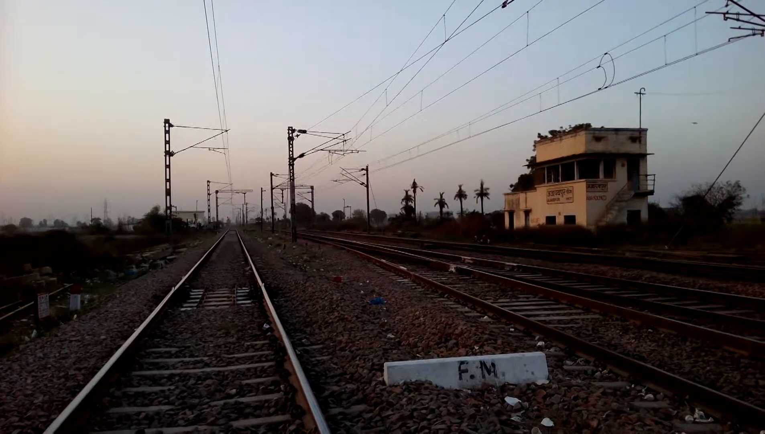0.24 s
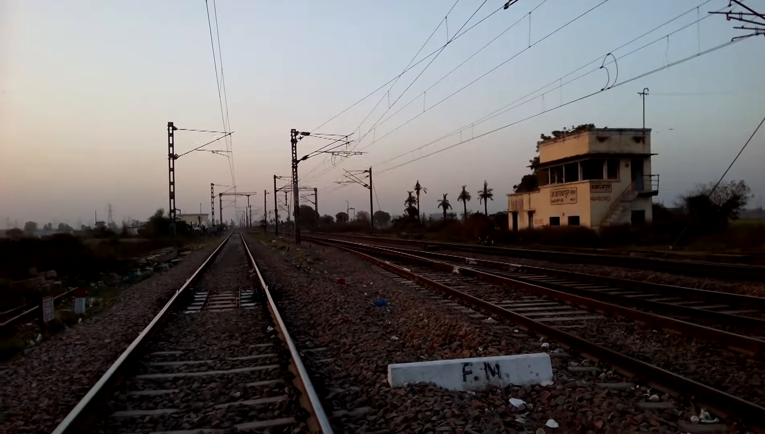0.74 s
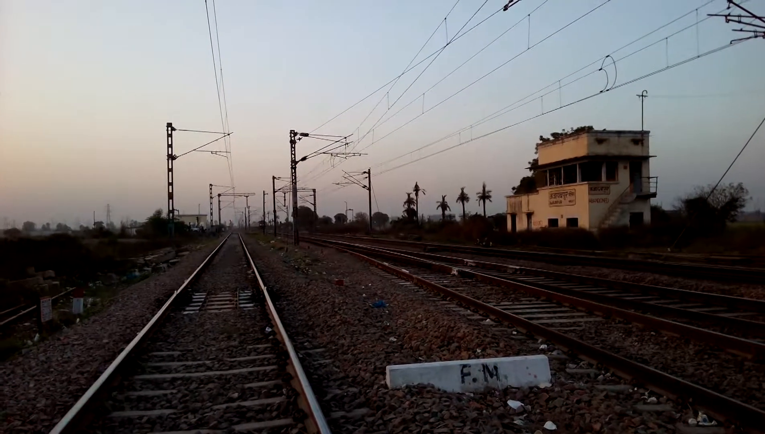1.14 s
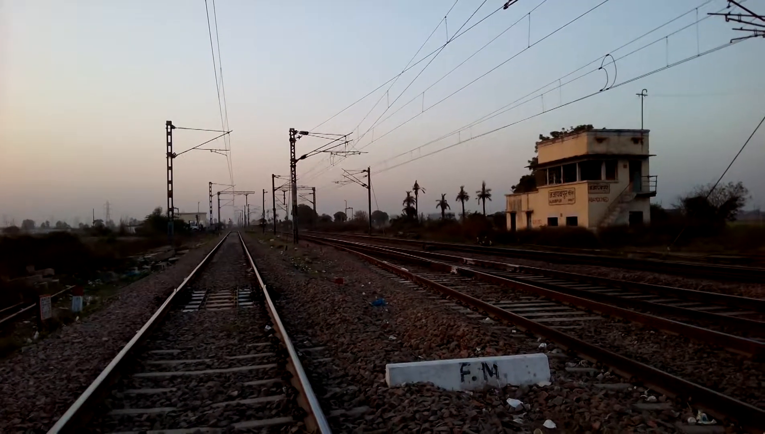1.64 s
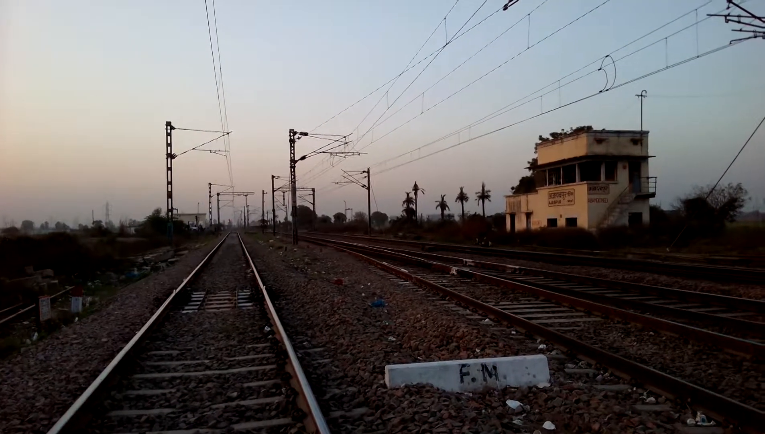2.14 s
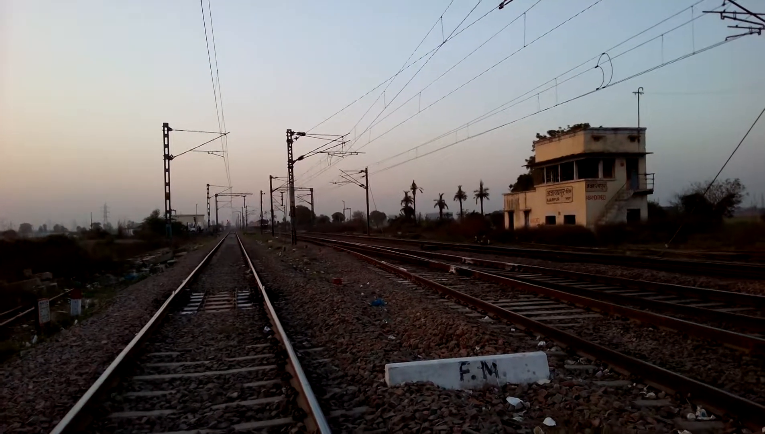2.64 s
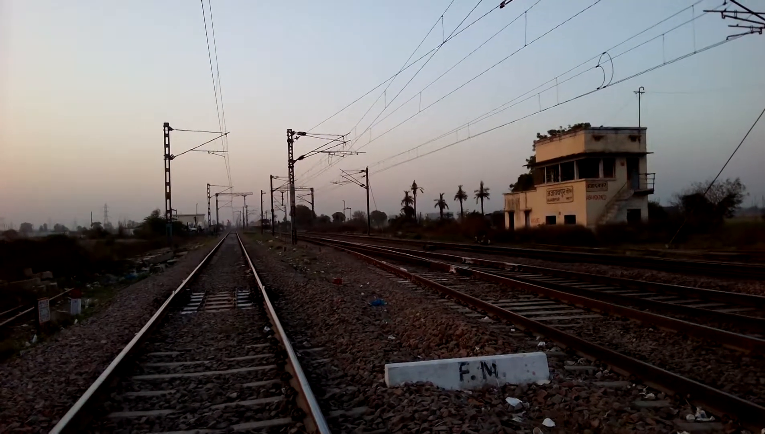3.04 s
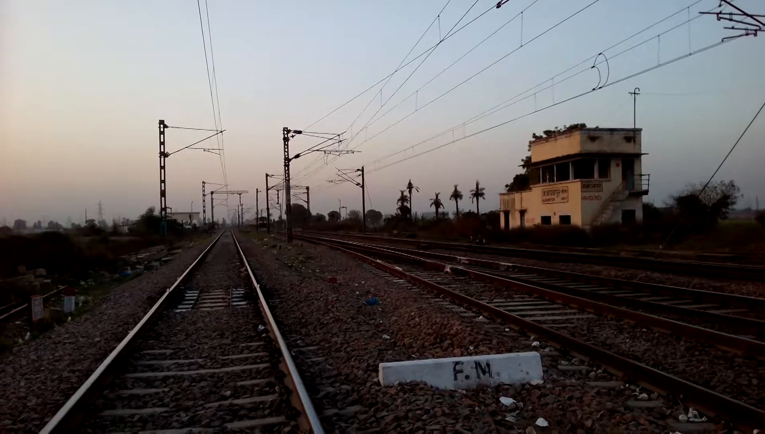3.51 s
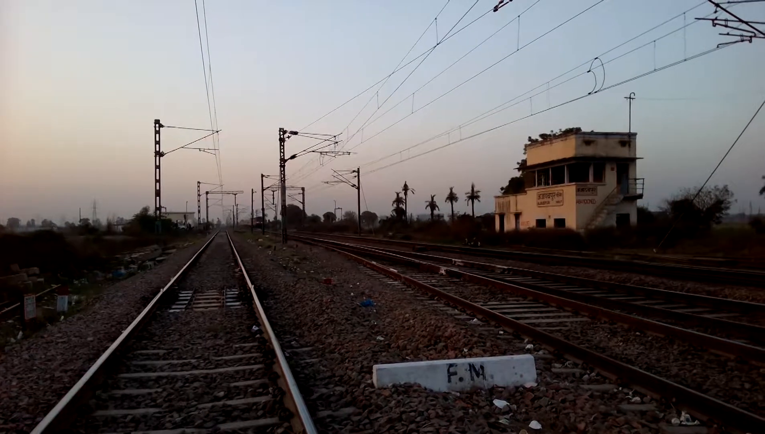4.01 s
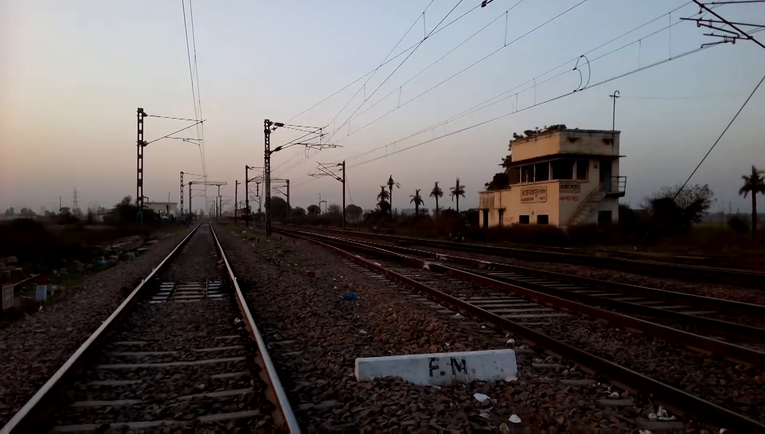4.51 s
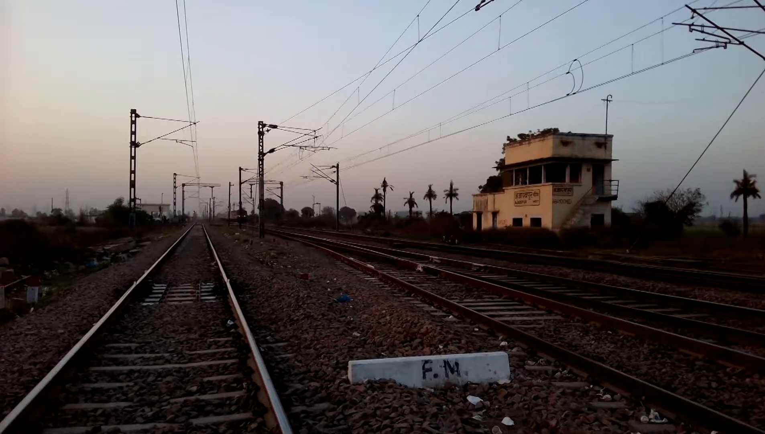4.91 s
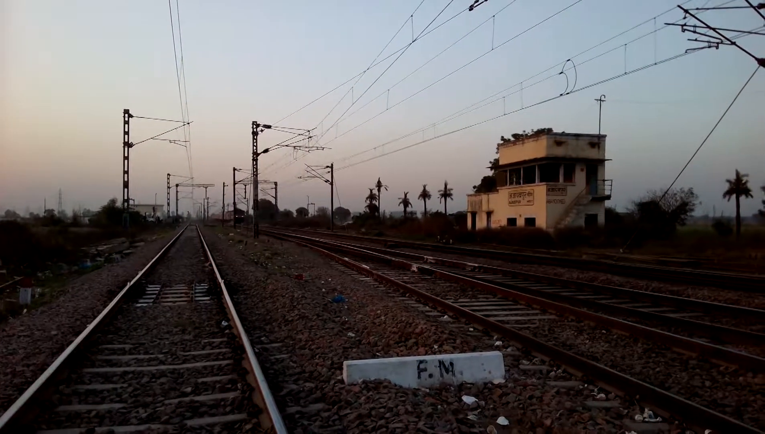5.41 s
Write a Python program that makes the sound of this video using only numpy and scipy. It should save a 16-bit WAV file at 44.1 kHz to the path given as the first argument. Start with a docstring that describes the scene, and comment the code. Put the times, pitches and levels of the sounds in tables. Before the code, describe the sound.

Beside open railway tracks, an approaching locomotive blows one nearly level note with faint sliding echoes. A bird gives quick high trills and raspy chirps, with a sharp tick early on. Rolling rumble and metallic rail song grow; first wheel knocks come around four seconds. The horn shuts off just before five, leaving a brief tail, then crashing, pinging wheels grow loudest at the cut. A small stereo microphone stands close to the line.

```python
"""A train horn holds one slowly rising note for almost five seconds, as a train bears down on a listener.
It is a harmonic series with fluttering partials; Doppler echoes slide to a lower pitch, two in turn.
Shaped noise makes the rumble, roar and ever louder song of the rails; resonances make whine and rail pings.
A small bird trills and chirps in gliding tones, and dry ticks snap and dull knocks thump as noise bursts.
Wheels crash over rail joints from four seconds on, most densely after the horn has stopped."""
import sys
import numpy as np
from scipy import signal
from scipy.fft import rfft, irfft, next_fast_len
from scipy.io import wavfile
from scipy.ndimage import uniform_filter1d

SR = 44100
rng = np.random.default_rng(int(sys.argv[2]) if len(sys.argv) > 2 else 0)


def dump(signal):
    """Clip the signal to [-1, 1] and save it as 16-bit WAV at the path in sys.argv[1]."""
    limited = np.clip(np.atleast_2d(signal).T, -1, 1)
    pcm = np.round(limited * 32767).astype(np.int16)
    wavfile.write(sys.argv[1], SR, pcm)


N = 249689
TIME = np.arange(N) / SR

# the horn's note as heard from ahead, and its creep upwards
HORN_HZ, HORN_RISE_HZ_PER_S = 313.9, 0.25
# the air valve shuts
HORN_STOP_S, RELEASE_DB_PER_S = 4.852, 271.5
# from here the listener slips out of the horn's beam as the train draws level
OFF_AXIS_S = 3.4


def from_db(db):
    """Logarithmic level: decibels to amplitude gain."""
    return 10 ** (np.asarray(db) / 20)


def rms_one(x):
    """Normalisation: scale to unit mean power."""
    return x / np.sqrt(np.mean(x ** 2) + 1e-20)


def in_time(rows):
    """Linear interpolation: each column of a time curve at every sample."""
    s, *columns = np.transpose(rows)
    return [np.interp(TIME, s, column) for column in columns]


def at_hz(points, hz):
    """Logarithmic frequency scale: read a spectrum between its points."""
    point_hz, value = np.transpose(points)
    return np.interp(np.log(np.maximum(hz, 1)), np.log(point_hz), value)


def drift(rate_hz):
    """Random modulation: low-passed noise of spread 1, made at every 40th sample and interpolated."""
    r = np.exp(-80 * np.pi * rate_hz / SR)
    white = rng.standard_normal(N // 40 + 2002)
    slow = signal.lfilter([1], [1, -2 * r, r * r], white)[2000:]    # drop the filter's start-up
    return np.interp(np.arange(N) / 40, np.arange(len(slow)), rms_one(slow))


def two_ports(scatter):
    """Partial coherence: white noise common to both ports, plus a scattered share of opposite sign."""
    common, apart = rng.standard_normal((2, N))
    return common + scatter * apart * np.array([[1], [-1]])


def noise(spectrum, scatter):
    """Spectral shaping: coloured stereo noise of rms 1, falling steeply above the last point."""
    size = next_fast_len(N)
    hz = np.fft.rfftfreq(size, 1 / SR)
    gain = from_db(at_hz(spectrum, hz)) / (1 + (hz / spectrum[-1][0]) ** 40)
    return rms_one(irfft(rfft(two_ports(scatter), size) * gain, size)[:, :N])


def resonate(x, hz, width_hz):
    """Resonance: two poles ring at one frequency, more briefly the wider the band."""
    r = np.exp(-np.pi * width_hz / SR)
    return signal.lfilter([1 - r, 0, r - 1], [1, -2 * r * np.cos(2 * np.pi * hz / SR), r * r], x)


def resonate_twice(x, hz, width_hz):
    """Cascaded resonance: two equal resonators in series give a steep narrow band of rms 1."""
    return rms_one(resonate(resonate(x, hz, width_hz), hz, width_hz))


def burst(s, rise_s, fall_s):
    """Exponential growth and decay: an envelope that swells to 1 at time s and dies away."""
    age = np.where(TIME < s, (s - TIME) / rise_s, (TIME - s) / fall_s)
    return np.exp(-np.minimum(age, 30))


def after_stop(db_per_s, delay_s=0):
    """Exponential decay: a linear fall in dB, once the horn's valve has shut and a delay is over."""
    return -db_per_s * np.maximum(TIME - HORN_STOP_S - delay_s, 0)


def wavering_phase(hz, waver_hz, rate_hz):
    """Frequency modulation: phase [rad] is the running sum of a randomly wavering frequency."""
    return 2 * np.pi * np.cumsum(hz + waver_hz * drift(rate_hz)) / SR


# horn partials: (multiple, level when far [dB], level when near [dB]), against the level of the group
HORN_PARTIALS = [(1, 0, -0.5), (2, 0.5, -0.5), (3, -3.5, -3.5), (4, 2, 2.5), (5, -15.5, -13.5),
                 (6, -12.5, -22), (7, -15.5, -10.5), (8, -18, -16.5), (9, -18, -6), (10, -4.5, -1),
                 (11, -1.5, 1), (12, -11.5, -2.5), (13, -16.5, -4), (14, -18, -15.5)]
# level of the horn's fundamental: (time [s], level [dB])
FUNDAMENTAL_LEVEL = [(0.0, -29), (0.15, -28), (1.2, -26), (1.81, -29), (1.89, -27), (3.88, -27.5),
                     (4.84, -27)]
# level of its octave: (time [s], level [dB])
OCTAVE_LEVEL = [(0.0, -36), (0.81, -32.5), (1.89, -36), (1.93, -40.5), (2.25, -36.5), (2.52, -39.5),
                (2.64, -33), (2.92, -36.5), (3.41, -34), (3.81, -37), (4.52, -35), (4.84, -38.5)]
# level of its blare, partials 3-8: (time [s], level [dB])
BLARE_LEVEL = [(0.0, -37.5), (0.08, -41), (0.92, -38), (1.34, -40.5), (3.03, -37.5), (4.64, -45),
               (4.8, -43)]
# level of its brassy edge, partials 9 and up: (time [s], level [dB])
EDGE_LEVEL = [(0.0, -53.5), (0.409, -50), (1.87, -57), (2.7, -63.5), (2.83, -59), (2.939, -56.5),
              (3.34, -57), (3.55, -51.5), (4.0, -47.5)]
# moving air swells or fades single partials: (time [s], multiple, change [dB], half-length [s])
AIR_SWELLS = [(.08, 11, -11, .22), (.15, 13, 7, .25), (.2, 7, 7, .22), (.2, 14, 5, .2), (.45, 5, 3, .25),
              (.42, 11, 3, .15), (.45, 10, 3, .12), (.7, 11, 2, .18), (2.2, 3, 2.5, .2), (4.55, 7, -3, .35),
              (4.6, 11, -3, .3), (1.25, 11, 3, .4), (3.25, 11, 3, .25), (3.75, 11, -5, .15),
              (3.15, 3, -2, .5), (3.6, 14, -5, .4), (4.2, 6, 4, .45), (.7, 12, 4, .25), (1.2, 5, -7, .25),
              (1.35, 7, -6, .22), (1.4, 10, -12, .3), (1.8, 12, 6, .25), (1.95, 6, -10, .22),
              (2.5, 10, 4, .4), (3.35, 9, 7, .3), (3.7, 10, -9, .28), (3.7, 13, 2, .2), (4.2, 13, -4, .3),
              (4.1, 12, -3, .35), (3.85, 7, 3, .22), (4.4, 5, 4.5, .55)]


def horn(fade_db=1.88, flutter_db=0.9, wobble_hz=0.13, tremor_db=0.35, dispersion_rad=-0.1464,
         blur_rad_per_s=0.1, off_axis_db_per_s=7.5, late_s=0.092, late_share=0.34, late_db_per_s=240):
    """Harmonic series of a driven diaphragm: moving air makes the high partials fade and flutter most."""
    phase = wavering_phase(HORN_HZ + HORN_RISE_HZ_PER_S * TIME, wobble_hz, 14)
    shut_db = after_stop(RELEASE_DB_PER_S)
    off_axis_s = np.maximum(TIME - OFF_AXIS_S, 0)

    # a reflection of the fundamental outlasts the direct sound
    direct = (1 - late_share) * from_db(shut_db)
    late = late_share * from_db(after_stop(late_db_per_s, late_s))
    fundamental_db = in_time(FUNDAMENTAL_LEVEL)[0] + 20 * np.log10(direct + late)
    octave_db = in_time(OCTAVE_LEVEL)[0] + shut_db
    blare_db = in_time(BLARE_LEVEL)[0] + shut_db
    edge_db = in_time(EDGE_LEVEL)[0] + shut_db - off_axis_db_per_s * off_axis_s
    groups = [fundamental_db, octave_db] + [blare_db] * 6 + [edge_db] * 6

    # the ground reflection recolours the note as the train nears
    near = np.interp(TIME, [1.2, 2.4], [0, 1])
    out = np.zeros(N)
    for (k, far_db, near_db), group_db in zip(HORN_PARTIALS, groups):
        air_db = k / 10 * (fade_db * drift(1.82) + flutter_db * drift(28))
        for s, multiple, swell_db, length_s in AIR_SWELLS:
            if multiple == k:
                air_db = air_db + swell_db * np.exp(-((TIME - s) / length_s) ** 2)
        # off the beam, the high partials arrive scattered
        blur = blur_rad_per_s * (k - 1) * off_axis_s * drift(30)
        # the flare spreads each pulse out in time
        partial = np.cos(k * phase + dispersion_rad * k ** 2 + blur)
        level_db = group_db + far_db + (near_db - far_db) * near + air_db
        out += from_db(level_db) * partial
    return np.sqrt(2) * out * from_db(tremor_db * drift(38))


def horn_tail(level_db=-65.5, width_hz=7, fall_db_per_s=12):
    """Diffuse scattering off buildings and trees: narrow noise blurs the low partials and lingers."""
    drive = two_ports(scatter=0.32)
    blur = sum(resonate_twice(drive, k * HORN_HZ, width_hz) for k in range(1, 5))
    return blur * from_db(level_db + after_stop(fall_db_per_s))


def far_echo(level_db=-55, tilt_db=-1.53, flicker_db=3.0, waver_hz=3.504, hold_s=0.3, fall_db_per_s=70):
    """Distant reflection: wavering low partials are still heard for a moment once the horn has shut."""
    phase = wavering_phase(HORN_HZ, waver_hz, 14.92)
    tone = 0
    for k in range(1, 5):
        tone = tone + from_db(tilt_db * (k - 1.5) + flicker_db * drift(6.1)) * np.sin(k * phase)
    return np.sqrt(2) * tone * from_db(level_db + after_stop(fall_db_per_s, hold_s))


# level of the locomotive's whine: (time [s], level [dB])
MOTOR_LEVEL = [(0, -53), (.6, -57), (2.2, -57), (2.7, -55), (3.25, -52.5), (3.6, -61), (4.6, -60),
               (5.1, -76)]


def motor(hz=727, waver_hz=2, flicker_db=2):
    """Pure tone with random modulation: a faint wavering locomotive whine above the horn's octave."""
    phase = wavering_phase(hz, waver_hz, 7.7)
    return np.sqrt(2) * from_db(in_time(MOTOR_LEVEL)[0] + flicker_db * drift(3.7)) * np.sin(phase)


def hum(hz=166, level_db=-56, low_hz=81, low_db=-60.5, waver_hz=1.3, flicker_db=1.3, fade_db_per_s=3):
    """Tonal machinery drone: two wavering notes of the locomotive fade as it draws level."""
    out = 0
    for pitch_hz, db in ((hz, level_db), (low_hz, low_db)):
        phase = wavering_phase(pitch_hz, waver_hz, 11)
        out = out + np.sqrt(2) * from_db(db + flicker_db * drift(2.5)) * np.sin(phase)
    return out * from_db(-fade_db_per_s * np.maximum(TIME - OFF_AXIS_S, 0))


# what the wheels feed into the rail modes: (frequency [Hz], density [dB per Hz])
WHEEL_FORCE_SPECTRUM = [(1500, -5), (2500, 0), (4000, 0), (5500, -10), (7000, -21.5)]
# ringing modes of the rails: (frequency [Hz], width [Hz], level against the rail song [dB])
RINGING_MODES = [(2420, 72, -17), (2624, 37, -13), (3213, 37, -17), (3900, 44, -19.5)]


def rail_ring(flicker_db=4.0):
    """Modal excitation: rough steel rolling on steel rings the rail modes, each swelling on its own."""
    drive = noise(WHEEL_FORCE_SPECTRUM, scatter=0.26)
    out = 0
    for hz, width_hz, db in RINGING_MODES:
        out = out + from_db(db + flicker_db * drift(6.1)) * rms_one(resonate(drive, hz, width_hz))
    return out


# bright part of the rail song, which only carries at short range: (frequency [Hz], density [dB per Hz])
SIZZLE_SPECTRUM = [(900, -26.5), (1550, 1), (2300, -12.5), (3500, 3), (4300, 6.5), (5000, 0.5), (5900, -5),
                   (6700, -31.5), (7400, -42.5)]


def sizzle(patchy_db=2, count=4):
    """Band-wise modulation: the bright hiss of the rails, in bands that swell and fade on their own."""
    size = next_fast_len(N)
    edges_hz = np.geomspace(2800, 7400, count + 1)
    spectrum = rfft(noise(SIZZLE_SPECTRUM, scatter=0.23), size)
    # the outer bands take in all that lies beyond them
    band = np.searchsorted(edges_hz[1:-1], np.fft.rfftfreq(size, 1 / SR))
    out = 0
    for k in range(count):
        out = out + irfft(spectrum * (band == k), size)[:, :N] * from_db(patchy_db * drift(4.2))
    return out


# nearness of the train, as the level of the singing rails: (time [s], level [dB])
APPROACH_LEVEL = [(0.0, -49.5), (0.99, -49.5), (1.51, -49), (1.91, -49), (4.08, -46), (4.68, -46),
                  (5.26, -44.5), (5.45, -42), (5.53, -43.5), (5.6, -39), (5.66, -35.5)]
# low rolling rumble, also shaken by the joints: (frequency [Hz], density [dB per Hz])
RUMBLE_SPECTRUM = [(20, -27.5), (35, -12), (46, -13.5), (62, -10), (82, -8), (102, -18.5), (135, -21),
                   (200, -23)]
# wheel roar: (frequency [Hz], density [dB per Hz])
ROAR_SPECTRUM = [(120, -24.5), (200, 3.5), (280, 3.5), (410, -5), (520, 0), (650, 4.5), (800, 1.5),
                 (1000, -1.5), (1350, -0.5), (1700, -18), (2400, -6), (4000, -32.5)]
# song of the rails: (frequency [Hz], density [dB per Hz])
RAIL_SPECTRUM = [(1200, -8), (1700, 0), (2100, -1), (2550, 5), (3000, -3.5), (3800, -4.5), (4400, -11),
                 (5000, -19.5), (5800, -22.5), (7200, -38)]
# level of the rails' bright hiss against their song: (time [s], level [dB])
HISS_LEVEL = [(0, -18.5), (.9, -24.5), (1.15, -28.5), (1.55, -28), (1.7, -13.5), (2.7, -18), (3.7, -9),
              (4.4, -10), (5.0, -13), (5.6, -12.5)]


def rolling(rattle_db=1.5, roar_flicker_db=2.0, roar_drop_db=1.0):
    """Rolling contact noise: rumble, roar and rail song grow and brighten; the roar thins at horn stop."""
    near_db, = in_time(APPROACH_LEVEL)
    swing_db = near_db - near_db.mean()
    # level at mid distance [dB], then the share of the approach's swing that it follows
    rumble_db = -51 + 0.27 * swing_db
    roar_db = -46 + 0.74 * swing_db
    song_db = -45.5 + 1.56 * swing_db

    rumble = from_db(rumble_db) * noise(RUMBLE_SPECTRUM, scatter=0.17)
    # the horn's air no longer adds to the roar
    air_stop_db = np.maximum(after_stop(RELEASE_DB_PER_S), -roar_drop_db)
    roar_gain = from_db(roar_db + roar_flicker_db * drift(23) + air_stop_db)
    roar = roar_gain * noise(ROAR_SPECTRUM, scatter=0.071)
    hiss = from_db(in_time(HISS_LEVEL)[0]) * sizzle()
    rails = 0.88 * noise(RAIL_SPECTRUM, scatter=0.31) + rail_ring() + hiss
    song = from_db(song_db + rattle_db * drift(27)) * rails
    return rumble + roar + song


def whine(hz=3655, width_hz=22, level_db=-53, full_s=3.6, swell_db_per_s=16, fade_db_per_s=1.4):
    """Narrow-band resonance: one wheel mode swells above the rolling noise, then slowly sinks into it."""
    before_s = np.maximum(full_s - TIME, 0)
    after_s = np.maximum(TIME - full_s, 0)
    envelope = from_db(level_db - swell_db_per_s * before_s - fade_db_per_s * after_s)
    return envelope * resonate_twice(two_ports(scatter=0.27), hz, width_hz)


# faint hiss of open air: (frequency [Hz], density [dB per Hz])
AIR_SPECTRUM = [(100, -11.5), (3000, 7), (7000, 3), (14000, 0)]


def open_air(level_db=-82.5):
    """Stationary background noise: a faint, widely scattered hiss."""
    return from_db(level_db) * noise(AIR_SPECTRUM, scatter=1.0)


def note(s, start_hz, end_hz, db, half_s=0.0052):
    """Frequency glide under a Gaussian envelope: one quick bird whistle."""
    out = np.zeros(N)
    near = np.abs(TIME - s) < 4 * half_s
    age = (TIME[near] - s) / half_s
    hz = start_hz + (end_hz - start_hz) * (1 + np.tanh(age / 2)) / 2
    out[near] = from_db(db) * np.exp(-age ** 2 / 2) * np.sin(2 * np.pi * np.cumsum(hz) / SR)
    return out


def chirp(s, top_hz, depth_hz, db, half_s=0.0091, rasp=0.038, low_hz=4130, low_db=3, octave_db=-25.5):
    """Two-voiced frequency modulation: a raspy whistle flicks up and down over a lower second voice."""
    out = np.zeros(N)
    near = np.abs(TIME - s) < 2 * half_s
    age = (TIME[near] - s) / half_s
    dip = 1 - np.exp(-(2 * age) ** 2)
    smooth = rms_one(uniform_filter1d(rng.standard_normal(SR // 10), size=40))
    shake = 1 + rasp * np.resize(smooth, len(age))
    high = 2 * np.pi * np.cumsum((top_hz - depth_hz * dip) * shake) / SR
    low = 2 * np.pi * np.cumsum(low_hz * shake) / SR
    low_voice = np.sin(low) + from_db(octave_db) * np.sin(2 * low)
    voices = np.sin(high) + from_db(low_db) * low_voice
    out[near] = from_db(db) * np.exp(-age ** 4) * voices
    return out


def foliage(x, wet_db=-5, fall_s=0.018):
    """Diffuse scattering: leaves and ballast blur a call briefly, differently at each port."""
    scatter = rng.standard_normal((2, SR // 8)) * np.exp(-TIME[:SR // 8] / fall_s)
    scatter = scatter / np.sqrt(np.sum(scatter ** 2, axis=1, keepdims=True))
    return x + from_db(wet_db) * signal.fftconvolve(x[None], scatter)[:, :N]


# bird trills: (time of the last note [s], level [dB], time between notes [s])
BIRD_TRILLS = [(.38, -50.5, .037), (1.096, -48, .0372), (1.835, -47.5, .037), (2.54, -49, .038),
               (3.25, -51, .036)]
# chirps arching up in pitch and down: (time [s], top [Hz], depth of the arch [Hz], level [dB])
BIRD_CHIRPS = [(.293, 7000, 1070, -65.5), (.675, 7350, 302, -70), (.725, 6400, 1010, -61),
               (.82, 5900, 400, -65.5), (.89, 5900, 1800, -62), (.937, 6300, 150, -69),
               (1.28, 5800, 250, -67), (1.362, 5800, 713, -63.5), (1.829, 5900, 1310, -58),
               (1.885, 6650, 1690, -56), (1.98, 6660, 1500, -64), (2.497, 5870, 1810, -64),
               (2.562, 6250, 2090, -59.5), (2.951, 5970, 1880, -60.5), (3.03, 6200, 2130, -55),
               (3.525, 5950, 1710, -58.5), (3.6, 6070, 2020, -55), (4.071, 6000, 1550, -55),
               (4.69, 6180, 2110, -57)]


def bird(low_hz=3760, high_hz=3960, glide_hz=110, uneven_db=2.5, swell_db=0.8, count=9):
    """Frequency-modulated calls: trills of falling notes swell and step up halfway; sharp chirps join."""
    pitches = np.interp(np.arange(count), [3, 5], [high_hz, low_hz])    # counted back from the last note
    trills = 0
    for s, db, gap_s in BIRD_TRILLS:
        for k, hz in enumerate(pitches):
            note_db = db - swell_db * k + uneven_db * rng.standard_normal()
            trills = trills + note(s - k * gap_s, hz + glide_hz, hz - glide_hz, note_db)
    chirps = sum(chirp(*row) for row in BIRD_CHIRPS)
    return (trills + foliage(chirps)) * from_db([[3], [0]])    # left, right


# sharp ticks close by, the first with a small bounce: (time [s], level [dB], fall [s])
TICK_TIMES = [(.158, -31, .0016), (.1665, -43, .002), (2.645, -45.5, .0025)]
# colour of the ticks: (frequency [Hz], density [dB per Hz])
TICK_SPECTRUM = [(800, -3), (2000, 1), (4800, -4.5), (6000, -10), (8000, -21), (12000, -26), (14500, -47.5)]


def tick(tail_db=-21, tail_s=0.027):
    """Impulsive noise: dry snaps with a short tail, close by on the right."""
    envelope = 0
    for s, db, fall_s in TICK_TIMES:
        snap = burst(s, 0.00054, fall_s)
        tail = from_db(tail_db) * burst(s, 0.0004, tail_s)
        envelope = envelope + from_db(db) * (snap + tail)
    return envelope * noise(TICK_SPECTRUM, scatter=0.96) * from_db([[-7], [0]])    # left, right


# the train passes reflectors of its horn: (time of passing [s], level [dB], fall [s], octave level [dB])
PASSED_REFLECTORS = [(0.231, -46.5, 0.89, -6), (2.06, -48.5, 1.2, -3.5)]


def echo(leaving_hz=269.2, glide_s=0.1, peak_after_s=0.091, rise_s=0.49, waver_hz=1.0, flicker_db=3,
         blur_hz=9, release_db_per_s=60):
    """Doppler effect: the train nears, then leaves a reflector, so its echo slides down, blurred midway."""
    out = 0
    for s, db, fall_s, octave_db in PASSED_REFLECTORS:
        past = (1 + np.tanh((TIME - s) / glide_s)) / 2
        spread_hz = waver_hz + blur_hz * 4 * past * (1 - past)
        phase = wavering_phase(HORN_HZ + (leaving_hz - HORN_HZ) * past, spread_hz, 16)
        tone = from_db(flicker_db * drift(4.5)) * np.sin(phase)
        octave = from_db(octave_db + flicker_db * drift(7)) * np.sin(2 * phase)
        out = out + from_db(db) * burst(s + peak_after_s, rise_s, fall_s) * (tone + octave)
    return np.sqrt(2) * out * from_db(after_stop(release_db_per_s))


# dull knocks, the late ones thumping as wheels crash over the joints: (time [s], level before dulling [dB],
# fall [s], dulled above [Hz])
DULL_KNOCKS = [(1.630, -38.5, .012, 1150), (1.672, -38.5, 0.033, 800), (1.798, -40.5, .013, 2100),
               (4.835, -36.5, 0.027, 900), (5.284, -33, .012, 1300), (5.427, -29, 0.0034, 1200),
               (5.484, -35, .01, 1200), (5.555, -30.5, 0.011, 1300), (5.604, -33, 0.0088, 1197)]
# colour of the knocks before dulling: (frequency [Hz], density [dB per Hz])
KNOCK_SPECTRUM = [(250, -22), (650, 1.5), (1250, -3.5), (1700, 0), (3500, -16.5)]


def knocks(rise_s=0.013):
    """Low-pass filtered impact: dull thumps, the last with wheels on joints, each dulled by its own distance."""
    body = noise(KNOCK_SPECTRUM, scatter=0.27)
    out = 0
    for s, db, fall_s, dull_hz in DULL_KNOCKS:
        dulled = signal.sosfilt(signal.butter(2, dull_hz, fs=SR, output="sos"), body)
        out = out + from_db(db) * burst(s, rise_s, fall_s) * dulled
    return out


# rail modes pinging as wheels strike: (time [s], frequency [Hz], level [dB], fall [s])
RAIL_PINGS = [(3.9, 2640, -45.5, .08), (4.405, 2580, -40, 0.014), (4.462, 3240, -44, 0.03),
              (4.622, 4500, -46, .025), (4.72, 3770, -51, .02), (5.277, 2610, -35, 0.021),
              (5.43, 2660, -27, 0.02), (5.613, 3300, -31, 0.021), (5.631, 3830, -29, 0.014)]


def pings(rise_s=0.0073, width_hz=150):
    """Guided wave: a struck rail carries one mode far ahead of the wheels, as a short rough ring."""
    drive = two_ports(scatter=0.71)
    out = 0
    for s, hz, db, fall_s in RAIL_PINGS:
        out = out + from_db(db) * burst(s, rise_s, fall_s) * resonate_twice(drive, hz, width_hz)
    return out


# wheels over joints: (time [s], level of the blow [dB], rise [s], fall [s])
JOINT_BLOWS = [(4.008, -35.5, 0.0046, 0.029), (4.255, -32.5, 0.013, 0.022), (4.32, -36, .006, 0.021),
               (5.284, -32.5, 0.011, 0.02), (5.339, -34, 0.01, 0.039), (5.374, -31.5, 0.0063, 0.044),
               (5.410, -26.5, 0.01, 0.014), (5.425, -23, 0.0083, 0.033), (5.490, -27, .012, 0.03),
               (5.544, -26.5, 0.0047, 0.01), (5.561, -22, 0.0083, 0.010), (5.609, -25, 0.023, .015),
               (5.624, -24, 0.0062, 0.028), (5.657, -20, .009, .02)]
# colour of the crash: (frequency [Hz], density [dB per Hz])
CRASH_SPECTRUM = [(150, -24), (240, -1), (400, -14.5), (560, -16), (760, -6.5), (950, -12.5), (1350, 2.5),
                  (1550, -4.5), (2100, 0.5), (2800, -0.5), (4000, 0), (5400, -8.5), (6500, -26),
                  (7400, -27.5)]


def joints(rattle_db=-0.5, crash_db=-2.5, ring_db=-3, thump_db=-21.0):
    """Impact excitation: axles slam over rail gaps, a rattling crash that rings rails and shakes ground."""
    power = sum((from_db(db) * burst(s, rise_s, fall_s)) ** 2 for s, db, rise_s, fall_s in JOINT_BLOWS)
    force = np.sqrt(power)
    struck = noise(CRASH_SPECTRUM, scatter=0.19) + from_db(ring_db) * rail_ring()
    crash = from_db(rattle_db * drift(130) + crash_db) * struck
    thump = from_db(thump_db) * noise(RUMBLE_SPECTRUM, scatter=0.098)
    return force * (crash + thump)


def scene():
    """Superposition: train, bird, ticks and open air add up, eased in and out over 3 ms."""
    blast = horn() + horn_tail() + far_echo() + echo()
    running = motor() + hum() + rolling() + whine() + knocks() + pings() + joints()
    ease = np.clip(np.minimum(TIME, TIME[-1] - TIME) / 0.003, 0, 1)
    return (blast + running + open_air() + bird() + tick()) * np.sin(np.pi / 2 * ease) ** 2


# the two microphone ports: (frequency [Hz], left minus right [dB])
PORT_LEVELS = [(60, -3), (320, -3.5), (480, 6), (630, -1), (740, -5), (850, -7.5), (950, 9), (1050, 4.5),
               (1260, -4.5), (1520, -1.5), (1700, -7.5), (1900, -8.5), (2550, -18), (3100, -18.5),
               (3700, -12), (5300, -21.5), (6300, -10.5), (7300, 2.5), (9000, -3)]
# lead of the left port: (frequency [Hz], phase [rad])
PORT_LEAD = [(20, 0), (315, 0.5), (630, 0.25), (930, 1.92), (1260, 0.33), (1850, 1.46), (2500, 1),
             (3400, 4), (4400, 5), (7000, 12)]


def record(dry, cutoff_hz=15100):
    """Interchannel level and phase difference: two unequal microphone ports; the top is cut."""
    size = next_fast_len(N + SR // 10)
    hz = np.fft.rfftfreq(size, 1 / SR)
    left = from_db(at_hz(PORT_LEVELS, hz)) * np.exp(1j * at_hz(PORT_LEAD, hz))
    # the centre keeps its level, unless the ports nearly cancel
    centre = np.maximum(np.abs(1 + left) / 2, 0.35)
    ports = np.array([left, np.ones_like(left)]) / centre
    heard = irfft(rfft(dry, size) * ports, size)[:, :N]
    return signal.sosfilt(signal.cheby2(12, 70, cutoff_hz, fs=SR, output="sos"), heard)


dry = scene()
out = record(dry)
dump(out)
```